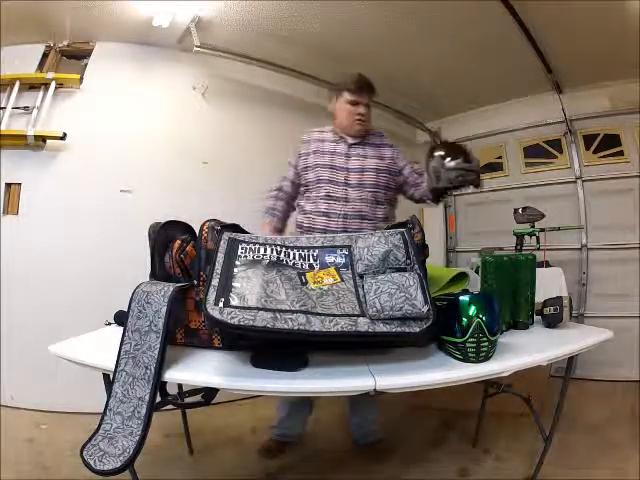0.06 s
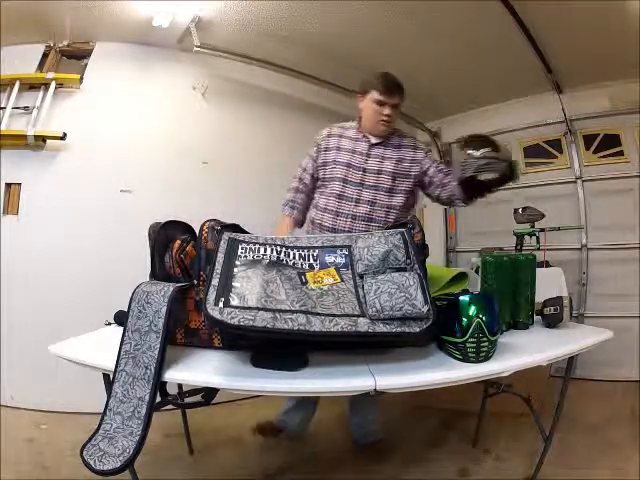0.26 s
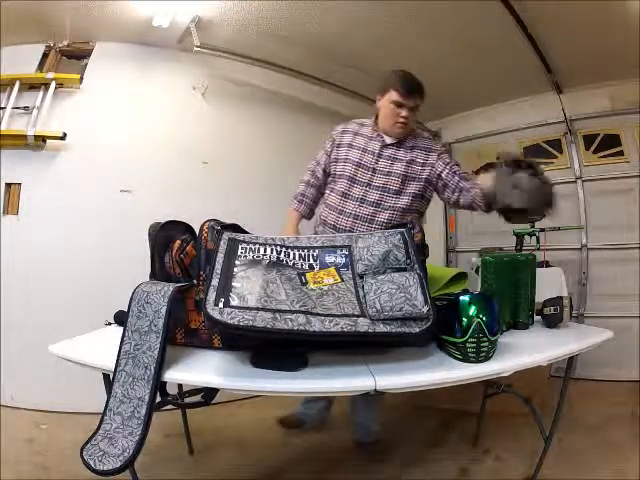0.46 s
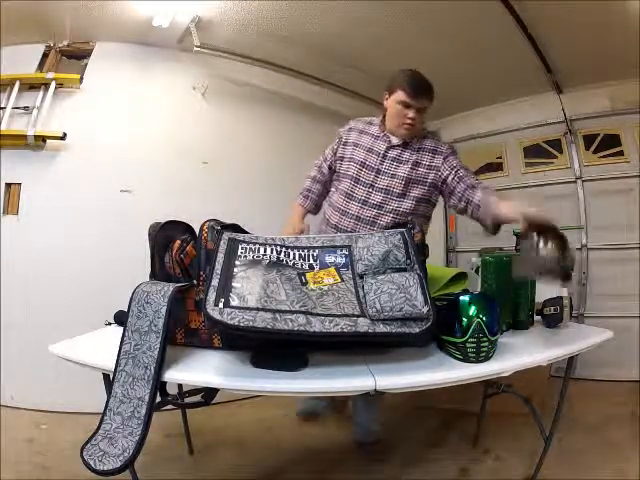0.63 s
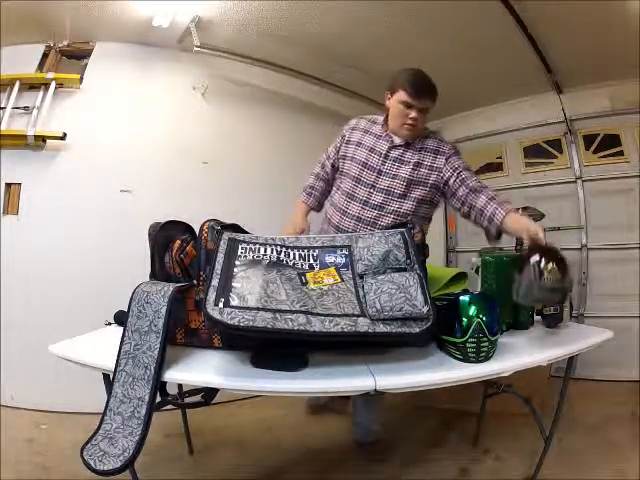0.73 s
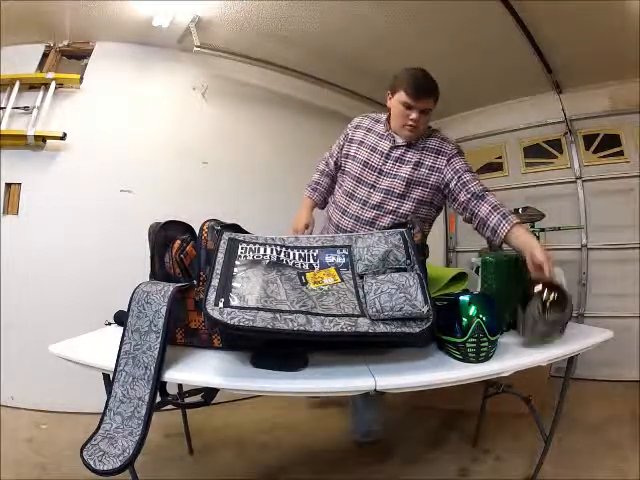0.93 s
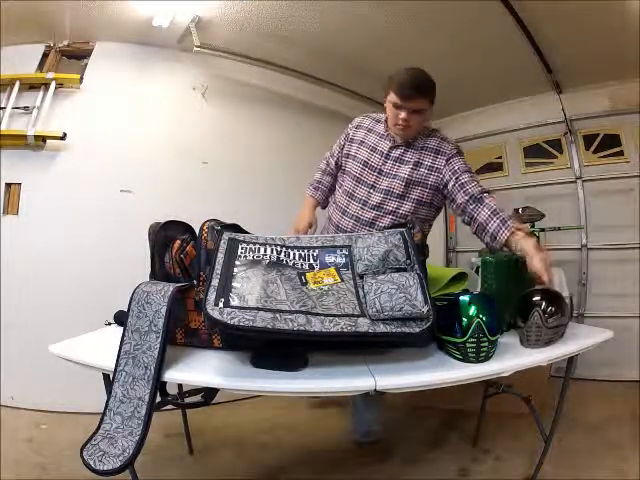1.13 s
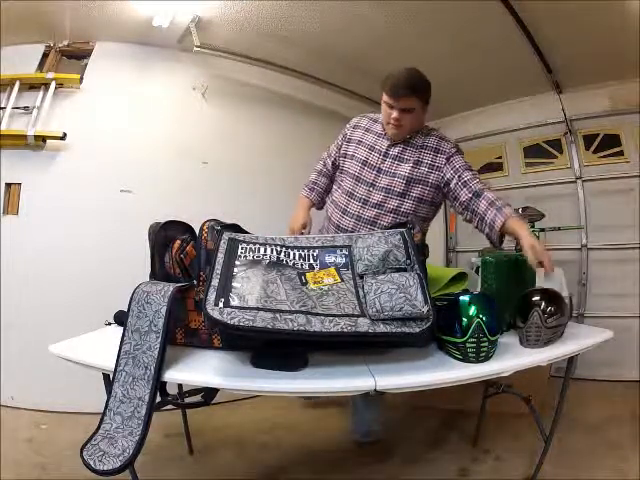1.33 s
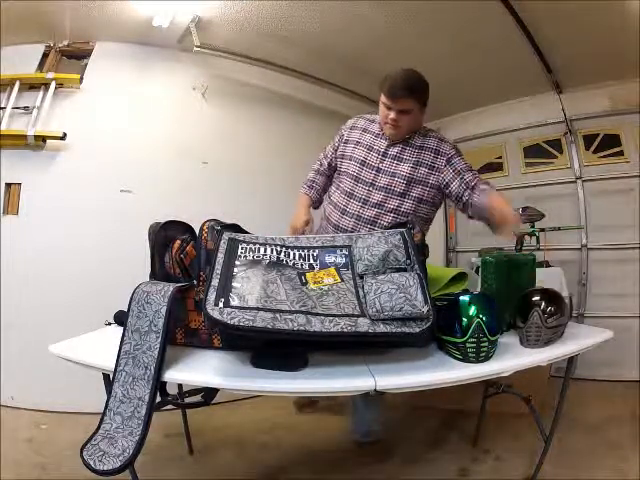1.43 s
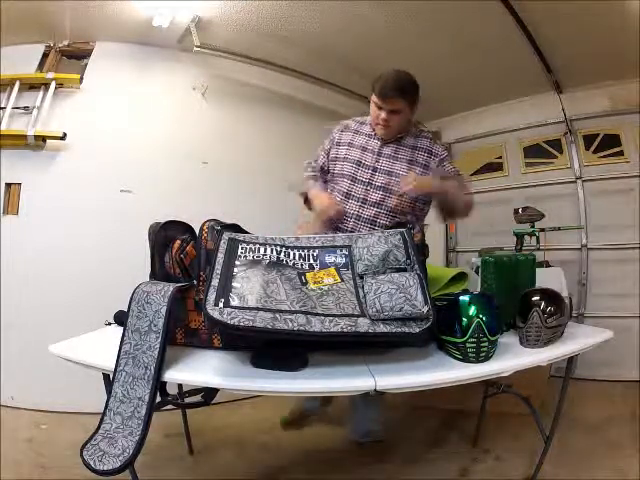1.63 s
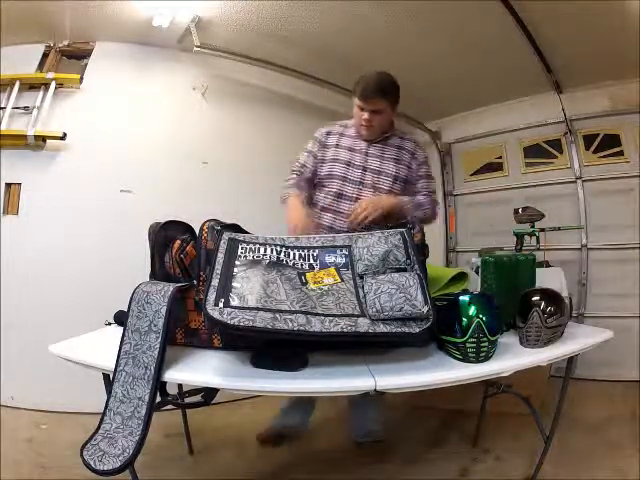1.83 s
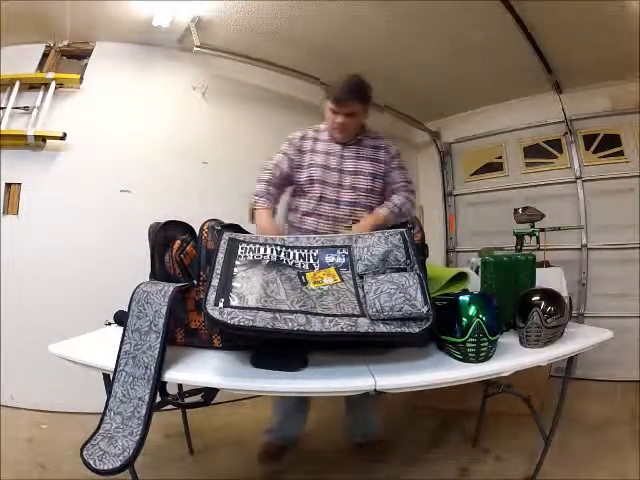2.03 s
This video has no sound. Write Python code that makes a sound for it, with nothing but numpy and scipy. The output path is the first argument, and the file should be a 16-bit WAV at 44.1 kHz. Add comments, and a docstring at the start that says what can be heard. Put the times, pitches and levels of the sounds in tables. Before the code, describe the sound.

A hard plastic mask is set on a folding table with one sharp double-edged clack and low hollow boom, ringing in a bare garage; faint shirt rustle and shoe scuff before, soft bag thud after.

```python
"""Quiet garage air and the rustle of a shirt come first, both noise shaped in spectrum; a shoe scuffs.
A hard plastic mask is set down on a folding table: its rim clacks as two short bursts of noise,
the hollow table top booms as a sum of decaying sines, and the bare room rings for half a second.
At the end comes a soft low knock, then a hand bumps the bag on the table: a damped thud,
a rub of fabric and a small rattle of narrow noise bands."""
import sys
import numpy as np
from scipy import signal
from scipy.fft import rfft, irfft
from scipy.io import wavfile

SR = 44100
rng = np.random.default_rng(int(sys.argv[2]) if len(sys.argv) > 2 else 0)


def digitize_waveform(pressure):
    """Quantize a signal to 16-bit integers and store it at the path in sys.argv[1].

    Rows of a 2-D input are taken as channels; values are limited to [-1, 1].
    """
    field = np.atleast_2d(pressure).T
    bounded = np.clip(field, -1, 1)
    quanta = np.round(bounded * 32767).astype(np.int16)
    wavfile.write(sys.argv[1], SR, quanta)


N = 91287


def amp(db):
    """Logarithmic level: 20 dB is a factor of ten in amplitude."""
    return 10 ** (np.asarray(db) / 20)


def seconds():
    """Sampled time: each sample lasts 1 / SR seconds."""
    return np.arange(N) / SR


def read(points, hz):
    """Log-frequency interpolation: a table's value at each frequency."""
    table_hz, value = np.transpose(points)
    return np.interp(np.log(hz + 1), np.log(table_hz), value)


def delayed(x, delay_s):
    """Pure delay: the same waveform begins delay_s later."""
    silence = np.zeros(max(round(delay_s * SR), 0))
    return np.concatenate([silence, x])[:N]


def colour(x, gain_db):
    """Minimum-phase filtering: the Hilbert transform of log gain supplies the phase of a causal filter."""
    hz = abs(np.fft.fftfreq(8192, 1 / SR))
    log_gain = np.log(amp(gain_db(hz)))
    response = np.exp(np.conj(signal.hilbert(log_gain)))
    taps = np.fft.ifft(response).real[:4096]
    return signal.fftconvolve(x, taps)[:N]


def noise(spectrum):
    """Spectral shaping: white noise weighted in frequency, then scaled to unit rms."""
    gain = amp(read(spectrum, np.fft.rfftfreq(N, 1 / SR)))
    x = irfft(rfft(rng.standard_normal(N)) * gain, N)
    return x / x.std()


def dying(t60_s):
    """Exponential decay: the level falls 60 dB in t60_s."""
    return np.exp(-np.log(1000) * seconds() / t60_s)


def ring(modes):
    """Modal superposition: decaying sines, neighbouring modes swinging opposite ways."""
    total = np.zeros(N)
    for k, (hz, db, t60_s) in enumerate(modes):
        sign = (-1) ** k
        total += sign * amp(db) * dying(t60_s) * np.sin(2 * np.pi * hz * seconds())
    return total


# Spectrum of the garage's still air. Columns: frequency_hz, relative_level_db
AIR_SPECTRUM = [(20, -9), (50, 3), (100, 1), (200, -1), (370, -3.5), (600, -11), (1000, -18.5), (2000, -20),
                (4000, -25), (8000, -30.5), (12000, -52.5)]
AIR_DB = -59  # rms at the microphone


def still_air():
    """Stationary noise: a steady random pressure with most of its strength in the bass."""
    return amp(AIR_DB) * noise(AIR_SPECTRUM)


# Rustle of the shirt as the arm swings. Columns: time_s, level_db
ARM_SWING = [(0, -58), (.17, -59), (.32, -64), (.38, -60), (.5, -76), (1.0, -61.5), (1.6, -91), (1.85, -84),
             (2.07, -61)]
# Hiss of the cloth. Columns: frequency_hz, relative_level_db
CLOTH_SPECTRUM = [(100, 24), (600, 1.5), (1500, 1), (3000, -0.5), (5000, -4), (9000, -8), (12500, -28),
                  (15000, -32)]
# Shoe scuffing on concrete. Columns: frequency_hz, relative_level_db
SCUFF_SPECTRUM = [(500, -2), (3200, -8), (4400, 1), (5400, -0.5), (6400, 0), (7800, -5.5), (9000, -16),
                  (15000, -47)]
# Time of the scuff's peak, its level there, and time constants before and after it
SCUFF_PEAK_S, SCUFF_DB, SCUFF_RISE_S, SCUFF_FADE_S = 0.197, -56, 0.017, 0.057


def movement():
    """Friction noise: shirt rustle follows the arm's swing; one shoe scuff swells and fades."""
    t = seconds()
    rustle = amp(np.interp(t, *np.transpose(ARM_SWING))) * noise(CLOTH_SPECTRUM)
    rise = (t - SCUFF_PEAK_S) / SCUFF_RISE_S
    fade = (SCUFF_PEAK_S - t) / SCUFF_FADE_S
    stroke = np.exp(np.minimum(rise, fade))
    return rustle + amp(SCUFF_DB) * stroke * noise(SCUFF_SPECTRUM)


# Garage reverberation in each band. Columns: frequency_hz, t60_s
GARAGE_DECAY = [(100, .46), (300, 0.66), (1000, 0.54), (3000, 0.51), (8000, 0.51), (15000, 0.52)]
ROOM_BUILD_S = 0.0027  # time constant


def garage(x):
    """Diffuse reverberation: a noise-like tail builds quickly and dies at its own speed in each band."""
    hz, t, bands = signal.stft(rng.choice([-1., 1.], SR), SR, nperseg=256)
    decay_db = -60 * t / read(GARAGE_DECAY, hz)[:, None]
    tail = signal.istft(bands * amp(decay_db), SR)[1]
    tail = tail * (1 - np.exp(-np.arange(len(tail)) / SR / ROOM_BUILD_S))
    return signal.fftconvolve(x, tail / np.linalg.norm(tail))[:N]


# Contacts of the mask's rim with the table. Columns: start_s, relative_level_db
RIM_CONTACTS = [(1.085, -2.5), (1.0874, 3)]
# Clack of the shell. Columns: frequency_hz, relative_level_db
SHELL_SPECTRUM = [(60, -23), (250, 2.5), (600, 3), (1000, -2), (1800, -5.5), (3200, -6), (5000, -15.5),
                  (8700, -16.5), (11000, -20.5), (13200, -23.5), (15000, -19)]
CLACK_DB, CLACK_T60_S = 3.5, 0.011
CLACK_DRY_DB, CLACK_ROOM_DB = -3.5, 2.5  # direct and reverberant shares


def mask():
    """Impact excitation: two quick rim contacts, each a short dense crack that the room carries on."""
    cracks, room = np.zeros(N), np.zeros(N)
    for start_s, db in RIM_CONTACTS:
        crack = rng.standard_normal(N) * dying(CLACK_T60_S)
        cracks += amp(db) * delayed(crack / np.linalg.norm(crack), start_s)  # unit energy
        room += amp(db) * garage(delayed(signal.unit_impulse(N), start_s))
    clack = amp(CLACK_DRY_DB) * cracks + amp(CLACK_ROOM_DB) * room
    return amp(CLACK_DB) * colour(clack, lambda hz: read(SHELL_SPECTRUM, hz))


# Modes of the table top. Columns: pitch_hz, relative_level_db, t60_s
TABLE_MODES = [(90, -15.5, 0.26), (134.2, 1.8, 0.33), (166.4, 16.5, 0.096), (167.2, 1.9, 0.3),
               (181.7, -13.5, 0.46), (237.34, -12.5, 0.47), (275.4, -11.5, 0.31), (347.5, -10.5, 0.17),
               (405.2, -27, 0.43)]
# Slap from the far walls. Columns: delay_s, relative_level_db
WALL_SLAPS = [(0.0429, -22), (0.0757, -10.3), (.1246, -13.4)]
THUMP_S, THUMP_DB, THUMP_RISE_S, THUMP_ROOM_DB = 1.0878, -9.5, 0.02, -16
TABLE_LOW_CUT_HZ = 68  # the table radiates little bass below this


def thump():
    """Modal radiation: the mask's weight sets the table booming; walls slap it back."""
    swell = 1 - np.exp(-seconds() / THUMP_RISE_S)
    boom = amp(THUMP_DB) * delayed(ring(TABLE_MODES) * swell, THUMP_S)
    low_cut = signal.butter(2, TABLE_LOW_CUT_HZ, "high", fs=SR, output="sos")
    boom = signal.sosfilt(low_cut, boom)
    slaps = sum(amp(db) * delayed(boom, delay_s) for delay_s, db in WALL_SLAPS)
    return boom + slaps + amp(THUMP_ROOM_DB) * garage(boom)


# Soft low knock just before the hand lands
KNOCK_S, KNOCK_HZ, KNOCK_DB, KNOCK_RISE_S, KNOCK_T60_S = 1.937, 233, -41, 0.0068, 0.082
# Damped thud of the bag. Columns: pitch_hz, relative_level_db
THUD_MODES = [(150, 1.5), (200, -1), (290, -2.5)]
BUMP_S, BUMP_DB, BUMP_T60_S = 2.0258, -37.5, 0.054
# Rub of the bag's fabric. Columns: frequency_hz, relative_level_db
FABRIC_SPECTRUM = [(60, -9), (180, 21), (350, 12), (700, -2), (1600, -12), (2400, 0.5), (3300, -7),
                   (5000, -5), (9500, -14.5), (15000, -24)]
RUB_DB, RUB_RISE_S, RUB_FADE_S = -50.5, 0.0022, 0.14  # rise and fade are time constants
# Rattle of a fitting on the bag. Columns: frequency_hz, width_hz, relative_level_db
RATTLE_BANDS = [(2320, 130, -1.5), (9650, 250, -15), (14400, 500, -15)]
RATTLE_S, RATTLE_DB, RATTLE_T60_S = 2.0365, -57, .45


def bag():
    """Damped impact and friction: a soft knock, then a thud, a rub of fabric and a small rattle."""
    t = seconds()
    knock = ring([(KNOCK_HZ, KNOCK_DB, KNOCK_T60_S)]) * (1 - np.exp(-t / KNOCK_RISE_S))
    thud = amp(BUMP_DB) * ring([(hz, db, BUMP_T60_S) for hz, db in THUD_MODES])
    rub_envelope = (1 - np.exp(-t / RUB_RISE_S)) * np.exp(-t / RUB_FADE_S)
    rub = amp(RUB_DB) * noise(FABRIC_SPECTRUM) * rub_envelope
    rattle = np.zeros(N)
    for hz, width_hz, db in RATTLE_BANDS:
        resonator = signal.iirpeak(hz, hz / width_hz, SR)
        band = signal.lfilter(*resonator, rng.standard_normal(N))
        rattle += amp(RATTLE_DB + db) * band / band.std() * dying(RATTLE_T60_S)
    return delayed(knock, KNOCK_S) + delayed(thud + rub, BUMP_S) + delayed(rattle, RATTLE_S)


def scene():
    """Linear superposition: the pressures of all sources add."""
    return (still_air() + movement() + mask() + thump() + bag())[None]


# Microphone housing: a notch, and a treble peak split by a slot
NOTCH_HZ, NOTCH_WIDTH_HZ, NOTCH_DB = 6000, 367, -26
PEAK_HZ, PEAK_WIDTH_HZ, PEAK_DB = 12000, 262, 38
SLOT_WIDTH_HZ, SLOT_DB = 102, -56  # centred on the peak


def housing_db(hz):
    """Resonance and cancellation: the housing's gain in dB at each frequency."""
    notch = NOTCH_DB / (1 + ((hz - NOTCH_HZ) / NOTCH_WIDTH_HZ) ** 2)
    peak = PEAK_DB / (1 + ((hz - PEAK_HZ) / PEAK_WIDTH_HZ) ** 2) ** 2
    slot = SLOT_DB / (1 + ((hz - PEAK_HZ) / SLOT_WIDTH_HZ) ** 8)
    return notch + peak + slot


# The recorder's own hiss. Columns: frequency_hz, relative_level_db
HISS_SPECTRUM = [(100, -8), (8000, -1), (15000, 2)]
HISS_DB = -77  # rms before the band limit
EDGE_HZ = 15330  # upper band limit


def record(dry):
    """Linear transduction: the housing colours the sound, hiss is added, and a low-pass limits the band."""
    x = colour(dry[0], housing_db) + amp(HISS_DB) * noise(HISS_SPECTRUM)
    low_pass = signal.firwin(801, EDGE_HZ, window=("kaiser", 9), fs=SR)
    return signal.oaconvolve(x, low_pass, "same")[None]


dry = scene()
out = record(dry)
digitize_waveform(out)
```